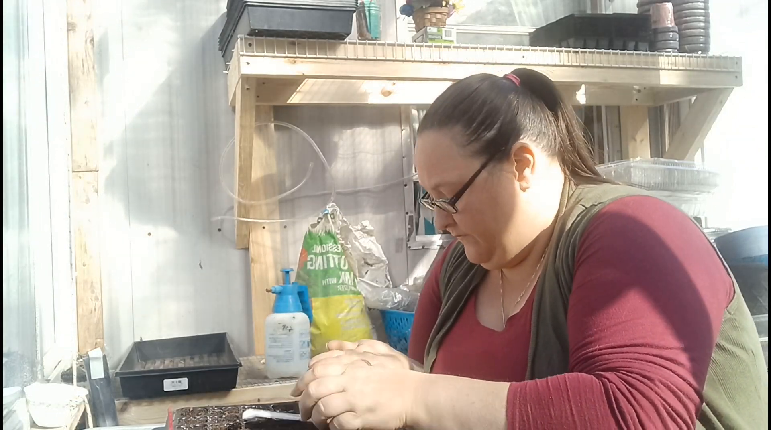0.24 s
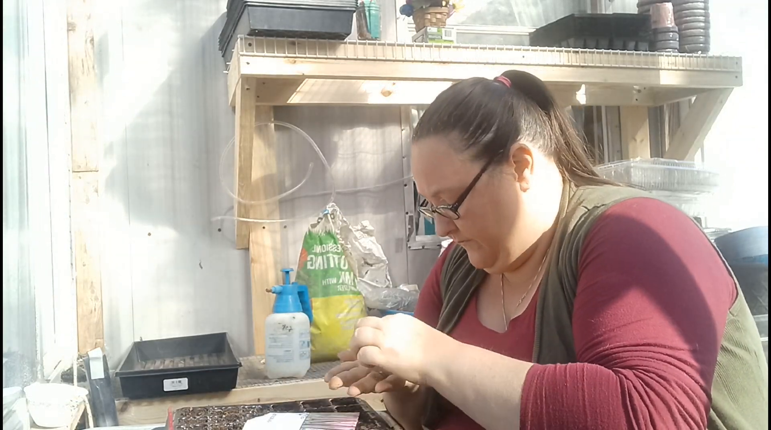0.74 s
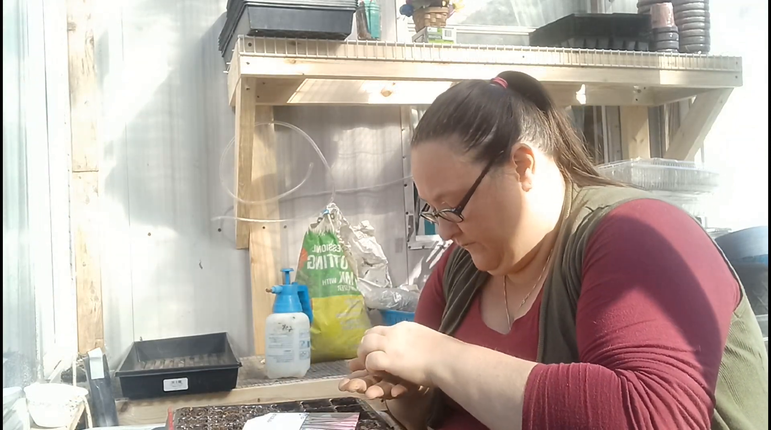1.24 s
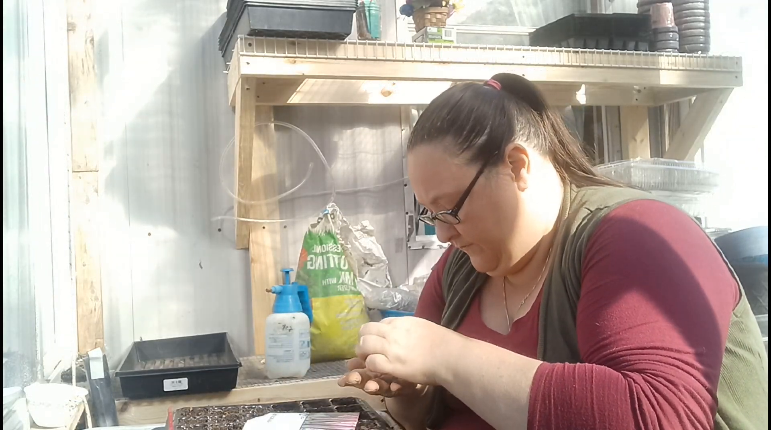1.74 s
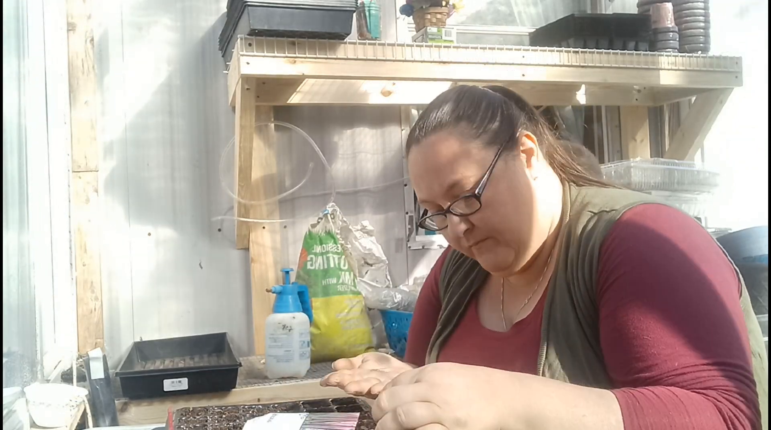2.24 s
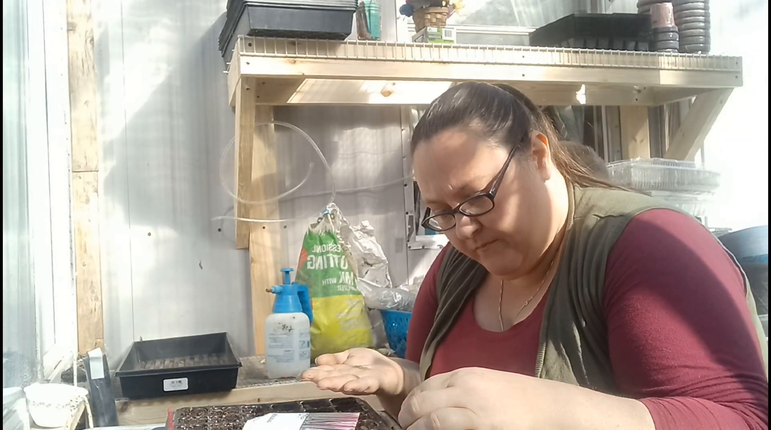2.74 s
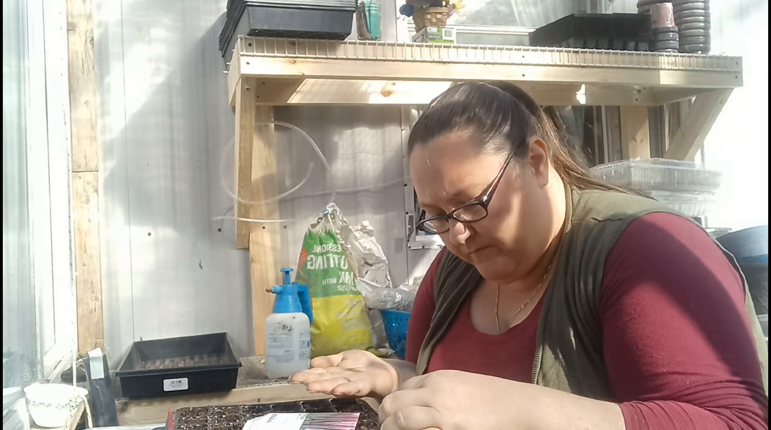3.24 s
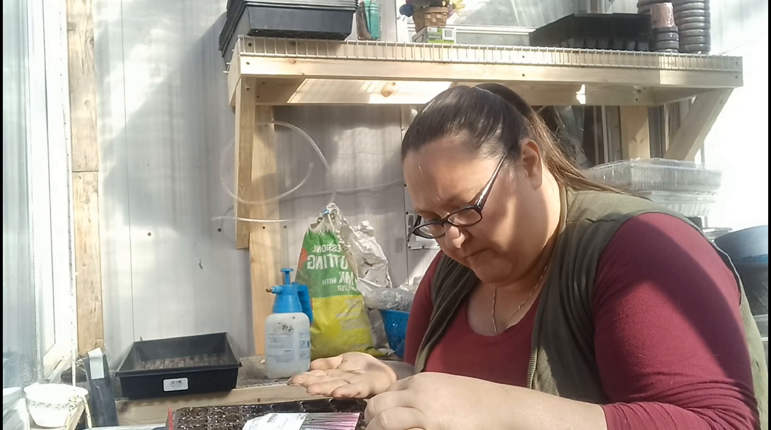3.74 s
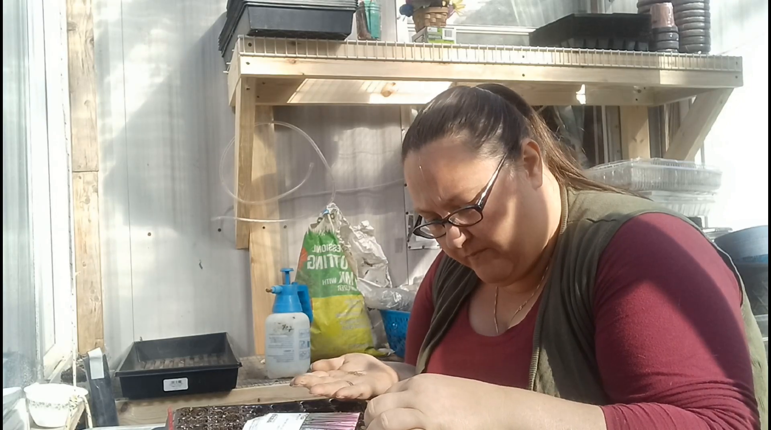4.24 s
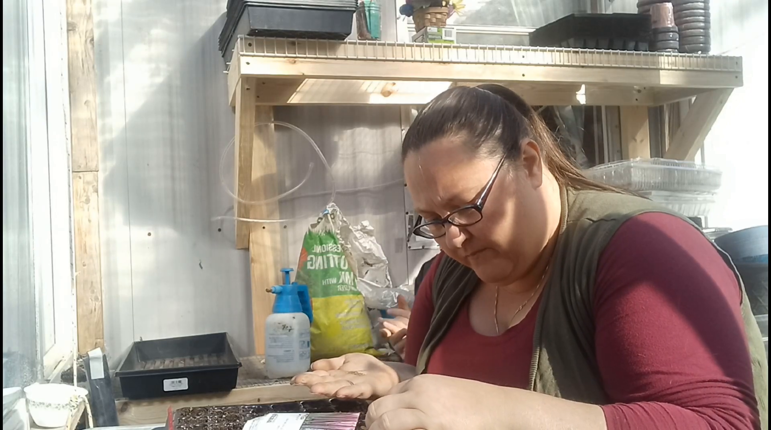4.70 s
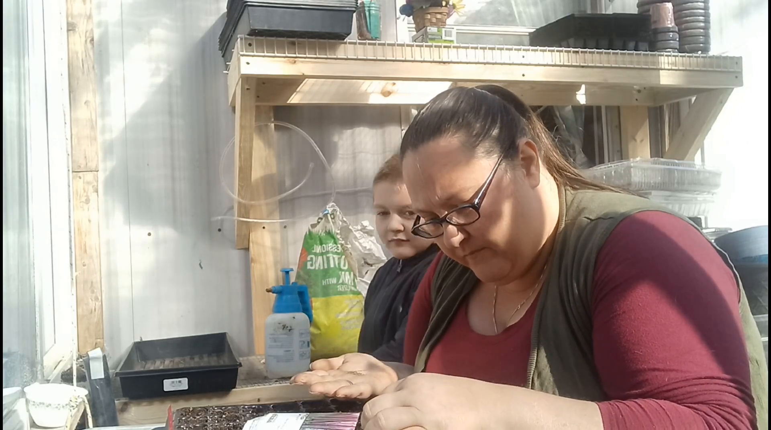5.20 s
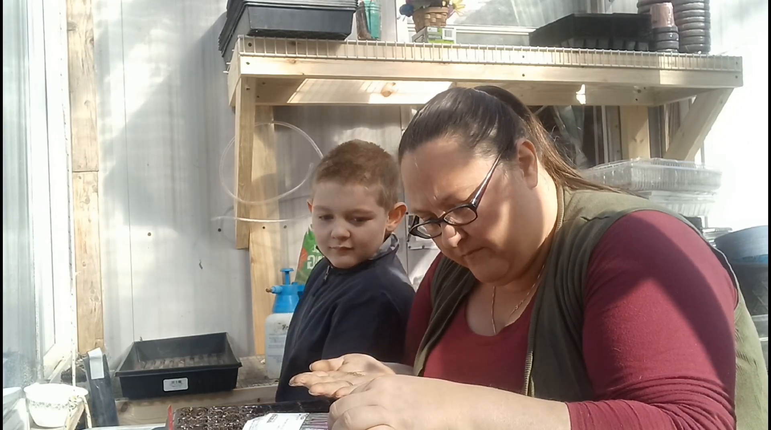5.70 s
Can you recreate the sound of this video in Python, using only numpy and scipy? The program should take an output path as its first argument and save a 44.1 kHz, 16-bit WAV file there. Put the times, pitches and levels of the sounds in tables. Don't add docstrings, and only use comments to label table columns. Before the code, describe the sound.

Close fingers rub a paper packet in dry, uneven swells with faint squeaks and creases, then pat and set it down softly. After a quiet lull with two tiny seed ticks, the paper crumples brightly, is flicked, a plastic tray is knocked, and the packet is slapped before softer rubbing. Small hard-walled greenhouse, short diffuse ring; stereo device microphone with hiss and low gust rumble.

```python
import sys
import numpy as np
from scipy import signal
from scipy.fft import rfft, irfft
from scipy.io import wavfile
from scipy.ndimage import uniform_filter1d

SR = 44100
rng = np.random.default_rng(int(sys.argv[2]) if len(sys.argv) > 2 else 0)


def voltage_ratio(level):
    return 10 ** (np.asarray(level, float) / 20)


def unload_wav(signal):
    wavfile.write(
        sys.argv[1],
        SR,
        np.round(np.clip(np.atleast_2d(signal).T, -1, 1) * 32767).astype(np.int16),
    )


N = 262742


def at_hz(points, hz):
    points = np.array(points)
    return np.interp(np.log(hz), np.log(points[:, 0]), points[:, 1])


def rms_one(x):
    return x / np.sqrt(np.mean(x ** 2) + 1e-20)


def drift(rate_hz):
    r = np.exp(-80 * np.pi * rate_hz / SR)
    white = rng.standard_normal(N // 40 + 2002)
    slow = signal.lfilter([1], [1, -2 * r, r * r], white)[2000:]
    return np.interp(np.arange(N) / 40, np.arange(len(slow)), rms_one(slow))


def bands(low_hz, high_hz, count):
    edges = np.geomspace(low_hz, high_hz, count + 1)
    return [(np.sqrt(a * b), signal.butter(2, [a, b], "band", fs=SR, output="sos"))
            for a, b in zip(edges, edges[1:])]


def swells(peak_s, peak_db, rise_s, fall_s, rest_db):
    roundness = 0.63
    t = np.arange(0, N + 64, 64)[:, None] / SR
    below = np.maximum((peak_s - t) / rise_s, (t - peak_s) / fall_s)
    power = voltage_ratio(2 * (peak_db - 20 * below ** roundness)).sum(1) + voltage_ratio(2 * rest_db)
    return np.interp(np.arange(N) / SR, t[:, 0], 10 * np.log10(power))


# pitch_hz, likeness [-1 to 1]
PORT_LIKENESS = [(60, 0.88), (180, 0.8), (550, 0.25), (1650, -0.22), (4970, 0.19), (15000, -0.11)]
# pitch_hz, level_db
LEFT_OVER_RIGHT = [(60, 4), (150, 7.5), (380, 0), (950, -0.5), (2380, 4), (5980, 0.5), (15000, 6)]


def stereo_band(white, hz, sos):
    mid, side = signal.sosfilt(sos, white)
    alike = at_hz(PORT_LIKENESS, hz)
    lean = voltage_ratio(at_hz(LEFT_OVER_RIGHT, hz) / 2)
    mid, side = np.sqrt(1 + alike) * mid, np.sqrt(1 - alike) * side
    return np.array([(mid + side) * lean, (mid - side) / lean])


def air(colour, low_hz, high_hz, count, patchy_db):
    white, out = rng.standard_normal((2, 2, N)), 0
    for k, (hz, sos) in enumerate(bands(low_hz, high_hz, count)):
        gain = voltage_ratio(at_hz(colour, hz) + patchy_db * drift(12.0))
        out = out + gain * stereo_band(white[k % 2], hz, sos)
    return out / np.std(out.mean(0))


def contact_burst(t, contact_s):
    swell = t * np.exp(-t / contact_s)
    burst = rng.standard_normal(len(t)) * swell
    for _ in range(12):
        spectrum = rfft(burst)
        flat = irfft(spectrum / (abs(spectrum) + 1e-12), len(t))
        burst = swell * flat / np.sqrt(abs(uniform_filter1d(flat ** 2, size=25)) + 1e-12)
    return burst + 1e-18


def struck(burst, colour):
    hz = np.maximum(np.fft.rfftfreq(len(burst), 1 / SR), 1)
    cepstrum = irfft(np.log(voltage_ratio(at_hz(colour, hz))))
    cepstrum[1:len(burst) // 2] *= 2
    cepstrum[len(burst) // 2 + 1:] = 0
    rung = irfft(rfft(burst) * np.exp(rfft(cepstrum)))
    return rung / np.linalg.norm(rung)


def contacts(events, colours):
    out, t = np.zeros(N), np.arange(8192) / SR
    for (start_s, peak_db, contact_s), colour in zip(events, colours):
        at = round((start_s - 0.8 * contact_s) * SR)
        out[at:at + len(t)] += voltage_ratio(peak_db + 24.0) * struck(contact_burst(t, contact_s), colour)
    return out


def grains(per_s, spread_db):
    sizes = voltage_ratio(spread_db * np.minimum(rng.exponential(1, N), 5)) * rng.choice([-1, 1], N)
    return rms_one(sizes * (rng.random(N) < per_s / SR))


# peak_s, sheen_db, rise_s, fall_s, weight_db (body over sheen)
TIPPING = [(0.0, -63, .05, 0.013, -9), (0.08, -71.5, .3, 0.15, -54), (0.212, -69, 0.05, 0.026, -24),
           (0.284, -82, 0.11, 0.32, -37), (0.37, -72.5, 0.063, 0.24, -9), (0.54, -74, 0.35, 0.16, -11),
           (0.658, -66.5, 0.067, 0.56, -20.5), (0.748, -70.5, 0.16, .2, -2), (0.816, -60, 0.12, 0.02, 7.5),
           (0.888, -74, 0.16, 0.019, 10.5), (1.17, -82, 0.12, 0.15, 2), (1.216, -82, 0.16, 0.28, 9),
           (1.3, -90, 0.15, 0.15, 3), (1.4, -85.5, 0.14, 0.13, -2), (1.482, -88.5, 0.21, 0.02, 14),
           (1.559, -88.5, 0.065, 0.025, 16), (1.68, -70.5, 0.021, 0.024, -26), (1.79, -77, 0.1, 0.053, 7.5),
           (1.848, -75, 0.061, 0.1, 3.5), (1.95, -84.5, 0.14, .2, -8), (2.054, -69, 0.17, 0.045, -8),
           (2.095, -66.5, 0.019, 0.096, -9)]
CRUMPLING = [(2.872, -102, 0.1, 0.058, -3), (2.959, -91, 0.083, 0.043, -24.5), (3.16, -84, 0.03, 0.21, 3),
             (3.252, -73, 0.15, 0.066, -1.5), (3.325, -62.5, 0.15, 0.13, -6.5), (3.42, -75.5, 0.3, 0.27, 6),
             (3.498, -63, 0.1, 0.12, -1.5), (3.664, -64, 0.095, 0.14, 7), (3.715, -45.5, 0.069, 0.078, -59),
             (3.765, -49, 0.036, 0.037, -30), (3.802, -51.5, 0.014, 0.084, -16),
             (3.85, -49.5, 0.078, 0.074, -30), (3.941, -49, 0.094, 0.026, -18),
             (3.966, -57.5, 0.065, 0.036, 9), (4.095, -67.5, 0.22, 0.16, 7), (4.21, -64.5, 0.15, 0.045, -2),
             (4.32, -76.5, 0.19, .1, -2), (4.42, -71.5, 0.17, 0.32, -1.5)]
SMOOTHING = [(4.632, -69, 0.14, 0.57, -18), (4.705, -59.5, 0.012, 0.24, -0.5),
             (4.76, -70.5, 0.077, 0.13, 12.5), (4.97, -84, .2, 0.27, -16.5), (5.06, -68, 0.16, 0.25, -10),
             (5.142, -64, 0.088, 0.13, 3), (5.226, -63.5, 0.33, 0.1, -0.5), (5.4, -69.5, 0.16, 0.97, -22),
             (5.602, -64, 0.43, 0.52, 0.5), (5.779, -64.5, 0.47, 0.085, -7), (5.818, -69, 0.036, 0.055, 8),
             (5.89, -64, 0.31, 0.096, -18)]
# peak_s, peak_db, rise_s, fall_s
LEANS = [(0.369, -81, 0.038, 0.23), (0.47, -82.5, 0.13, 0.18), (0.66, -89, 0.093, 0.13),
         (1.45, -102, 0.09, 0.17), (1.798, -91, 0.17, 0.15), (3.35, -85, 0.084, 0.12),
         (3.5, -79.5, 0.11, 0.093), (3.67, -74, 0.088, 0.13), (3.98, -73.5, 0.1, 0.13),
         (4.73, -75, 0.082, 0.25), (5.06, -80, 0.18, 0.09), (5.2, -79.5, 0.07, 0.13),
         (5.54, -78.5, 0.28, 0.69), (5.92, -84, 0.4, .2)]
# low_hz, high_hz
RUB_BANDS = [(11000, 15000), (4000, 8000), (1000, 2000), (250, 600)]
# pitch_hz, level_db
RUB_COLOUR = [(90, -5), (200, 1), (360, -5.5), (580, -1), (800, -5), (1250, -1.5), (2300, 3), (3600, 13),
              (5500, 19.5), (7500, 16), (9500, 1.5), (12500, 1), (15500, -2.3)]


def rubbing():
    still_db = -104
    peak_s, sheen_db, rise_s, fall_s, weight_db = np.transpose(TIPPING + CRUMPLING + SMOOTHING)
    rasp_db = -20.5 + 0.17 * weight_db
    hum_db = -19.5 + 0.59 * weight_db
    levels = np.array([swells(peak_s, sheen_db + over_db, rise_s, fall_s, still_db)
                       for over_db in (0 * weight_db, rasp_db, weight_db, hum_db)])
    lean_db = swells(*np.transpose(LEANS), still_db)
    levels[3] = 10 * np.log10(voltage_ratio(2 * levels[3]) + voltage_ratio(2 * lean_db))

    width_db = 10 * np.log10([[2 * (high - low) / SR] for low, high in RUB_BANDS])
    density_db = (levels - width_db)[::-1]
    centres = np.log([np.sqrt(low * high) for low, high in RUB_BANDS])[::-1]
    slips, together, out = grains(7000, spread_db=3.0), drift(3.04), 0
    for k, (hz, sos) in enumerate(bands(90, 18000, count=23)):
        shares = [np.interp(np.log(hz), centres, row) for row in np.eye(4)]
        patch_db = 1.2 * together + 1.3 * drift(8)
        gain = voltage_ratio(shares @ density_db + at_hz(RUB_COLOUR, hz) + patch_db)
        out = out + (-1) ** k * signal.sosfilt(sos, gain * slips)
    return out


# peak_s, peak_db, spread_s (for 20 dB)
GUSTS = [(0.0, -59, 0.25), (0.23, -68.5, 1.1), (0.46, -64, 0.05), (0.81, -71, 0.6), (1.13, -69, 0.5),
         (1.45, -68, 0), (1.78, -78, 0.5), (2.04, -66, 0), (2.18, -61.5, 0.46), (2.45, -66, -3.5),
         (2.6, -72.5, -0.2), (2.845, -59.5, 0.02), (3.07, -83, 3), (3.22, -66.5, -0.6), (3.37, -62, 0.2),
         (3.6, -71, -0.7), (3.82, -58, 0.17), (3.98, -63, -0.2), (4.13, -54.5, -0.7), (4.4, -69, -3.8),
         (4.66, -62.5, 1.8), (4.83, -49, -0.24), (5.1, -70, -1.6), (5.28, -66, -1.5), (5.531, -51.5, 0.28),
         (5.68, -53.5, -0.6), (5.93, -64, 0.4)]
# pitch_hz, level_db (per Hz)
RUMBLE_COLOUR = [(12, -54), (25, -33), (54, -11.5), (70, -3), (87, -6.5), (118, -31), (140, -18),
                 (180, -47), (310, -120)]


def rumble():
    lows = air(RUMBLE_COLOUR, 21.0, 149.0, count=7, patchy_db=-3.0)
    swing = uniform_filter1d(np.mean(lows ** 2, 0), size=1800)
    evened = rms_one(lows / (swing + 0.05) ** 0.28)
    peak_s, peak_db, spread_s = np.transpose(GUSTS)
    spread_s = np.maximum(spread_s, 0.07)
    return voltage_ratio(swells(peak_s, peak_db, spread_s, spread_s, rest_db=-82)) * evened


# pitch_hz, level_db (per Hz)
HISS_COLOUR = [(65, -39), (110, -10), (200, -22), (310, -21), (683, -21), (1040, -22), (1740, -21),
               (3400, -25), (4710, -27), (7000, -22), (9500, -19), (12000, -10), (15700, -8.5)]


def hiss():
    return voltage_ratio(-73.5) * air(HISS_COLOUR, 100, 17500, count=15, patchy_db=2.2)


# peak_s, peak_db, rise_s, fall_s, centre_hz
SQUEAKS = [(0.012, -70, 0.03, 0.06, 3500), (0.19, -70, 0.05, 0.11, 3850), (0.385, -72, .04, 0.07, 3520),
           (0.55, -73, 0.06, .12, 3750), (0.56, -75, 0.05, .1, 2550), (1.1, -72, .08, 0.12, 3280),
           (1.145, -67, 0.09, 0.07, 3900), (1.385, -70, 0.07, 0.1, 3520), (1.67, -77, 0.03, 0.03, 7000),
           (2.875, -79, 0.07, 0.05, 2350)]


def squeaks(width_hz):
    climb_hz_per_s = 500
    out, t = np.zeros(N), np.arange(N) / SR
    lowpass = signal.butter(2, width_hz / 2, fs=SR, output="sos")
    pair = signal.sosfilt(lowpass, rng.standard_normal((2, N)))
    for peak_s, peak_db, rise_s, fall_s, hz in SQUEAKS:
        centre_hz = hz + climb_hz_per_s * np.clip(t - peak_s, -rise_s, 0)
        turn = 2 * np.pi * np.cumsum(centre_hz) / SR
        level_db = swells(peak_s, peak_db, rise_s, fall_s, rest_db=-140)
        carried = rms_one(pair[0] * np.cos(turn) + pair[1] * np.sin(turn))
        out += voltage_ratio(level_db + 2.1 * drift(25)) * carried
    return out


# start_s, peak_db, contact_s
CREASES = [(0.092, -58, 0.0055), (0.383, -61, 0.0051), (0.649, -51, 0.0045), (0.789, -33, 0.0047),
           (0.813, -56, 0.0063), (0.874, -43, 0.0051), (1.219, -49, 0.0069), (1.459, -47.5, 0.0065),
           (3.33, -51, 0.0049), (3.499, -40, 0.005), (3.714, -31.5, 0.0045), (3.791, -35.5, 0.005),
           (3.849, -59, 0.0034), (3.934, -28, 0.0052), (4.693, -40.5, 0.0054), (4.924, -42, 0.0017)]
# pitch_hz, level_db (per Hz)
CREASE_COLOUR = [(180, -66), (300, -22), (1000, -4.5), (1300, 2.5), (4650, -17), (8010, 4.5), (8840, -1.5),
                 (12900, 3.5), (15500, -5)]


def creases():
    return contacts(CREASES, [CREASE_COLOUR] * len(CREASES))


# start_s, peak_db, contact_s
KNOCKS = [
    (1.716, -42.5, 0.0082),
    (2.113, -37.5, 0.0057),
    (2.134, -41.5, 0.0082),
    (4.111, -18.5, 0.0026),
    (4.361, -46.5, 0.0018),
    (4.451, -12.5, 0.0034),
    (4.562, -41, 0.0015),
    (4.802, -19, 0.0026),
]
# start_s, peak_db, contact_s
THUDS = [
    (1.745, -55, 0.0146),
    (2.148, -44.5, 0.026),
]
# pitch_hz, level_db (per Hz)
PAT = [(65, -17), (110, 7), (237, -1), (414, -21), (1190, -1), (3490, -7), (5980, -11), (12900, -6.5),
       (15500, -6)]
SET_DOWN = [(65, -34), (110, -14), (553, -4), (820, -3), (872, -12), (1100, 2.5), (1320, -5), (1660, -0.5),
            (15500, -29)]
FLICK = [(65, -54), (110, -18.5), (405, -18.5), (786, -10), (890, -20), (1100, -1.5), (1660, -8),
         (2200, -5.5), (2400, -4), (2840, 0.5), (4500, -3), (7210, -6.5), (9050, -15.5), (12900, -6),
         (15500, -8)]
TICK = [(350, -64), (600, -44), (886, -17), (1250, 3), (1910, -21), (2560, -8), (3080, -34), (4360, -24),
        (8000, -36), (10400, -73), (17600, -120)]
TRAY = [(65, -61), (110, -35), (279, -8.5), (400, -10), (510, -0.5), (626, -1), (694, 1.5), (754, -2),
        (909, -5.5), (1270, 0), (1460, -11.5), (2610, -12), (4120, -20), (5860, -6.5), (7060, -20.5),
        (12100, -21), (15500, -24)]
REBOUND = [(120, -57), (200, -42), (333, -19), (1260, 3), (1430, -2), (2290, -4), (2960, -9), (15500, -28)]
SLAP = [(65, -43.5), (110, -25.5), (213, -14.5), (653, -10.5), (837, -17), (1010, -3), (2700, -1),
        (3790, -7.5), (8160, -3), (9830, -25.5), (11600, -18), (15500, -11)]
BENCH = [(47, -32), (80, -6), (136, -14.5), (186, -7.5), (233, -15), (286, -6), (474, -17), (1500, -25),
         (1950, -72), (3300, -120)]


def knocks_and_thuds():
    bodies = [PAT, SET_DOWN, SET_DOWN, FLICK, TICK, TRAY, REBOUND, SLAP]
    return contacts(KNOCKS + THUDS, bodies + [BENCH, BENCH])


# pitch_hz, level_db, t60_s
BENCH_RING = (300, -55, 0.35)


def bench_ring():
    hz, level_db, t60_s = BENCH_RING
    t = np.clip(np.arange(N) / SR - THUDS[1][0], 0, None)
    level = voltage_ratio(level_db - 60 * t / t60_s + 3.3 * drift(17))
    return level * (1 - np.exp(-t / 0.027)) * np.sin(2 * np.pi * hz * t)


# start_s, peak_db, contact_s
SEEDS = [
    (2.4026, -74, 0.0003),
    (2.464, -68, 0.0003),
]
# pitch_hz, level_db (per Hz)
SEED_COLOUR = [(1000, -50), (5000, -20), (7000, 0), (10500, -2), (12500, -20), (15500, -30)]


def seeds():
    return contacts(SEEDS, [SEED_COLOUR] * len(SEEDS))


# start_s, peak_db, contact_s
FIBRES = [(3.7155, -44.5, 0.00021), (3.723, -52, 0.00015), (3.746, -44, 0.00015), (3.7694, -39, 0.00017),
          (3.7913, -33.5, 0.00015), (3.8, -35, 0.00022), (3.878, -50, 0.00018), (3.9378, -45, 0.00026),
          (3.952, -35, 0.00023), (4.925, -52, 0.00019)]
# pitch_hz, level_db (per Hz)
FIBRE_COLOUR = [(300, -46), (2000, -30), (6000, -8), (12900, -1), (15500, 1)]


def fibres():
    return contacts(FIBRES, [FIBRE_COLOUR] * len(FIBRES))


# start_s, peak_db, contact_s
CRACKS = [
    (4.1147, -26.5, 0.000425),
    (4.8056, -24, 0.00033),
]
# start_s, peak_db, contact_s
SETTLE = [
    (4.205, -46.5, 0.006),
]
# pitch_hz, level_db (per Hz)
SNAP = [(110, -27), (500, -22), (1100, -8), (1900, -10.5), (2350, 4.5), (2750, 2.5), (3300, -6),
        (7000, -22), (15500, -23)]


def cracks_and_settle():
    return contacts(CRACKS + SETTLE, [SNAP, SLAP, REBOUND])


def direct(x, level_db, lag):
    return voltage_ratio(level_db) * np.array([voltage_ratio(3.0) * np.roll(x, lag), voltage_ratio(-6.0) * x])


# pitch_hz, t60_s
SHED_RING = [(200, 0.29), (530, 0.23), (1390, 0.2), (3680, 0.21), (9700, 0.19)]


def shed(x, fill_cycles, count):
    spot_s, tail_cut_s = 0.03, 0.2
    t = np.arange(SR // 2) / SR
    white, echoes = rng.standard_normal((2, 2, count, len(t))), 0
    for k, (hz, sos) in enumerate(bands(60, 19000, count=16)):
        dying = voltage_ratio(-60 * t / at_hz(SHED_RING, hz))
        dying = dying * (1 - np.exp(-t / (0.0017 + fill_cycles / hz)))
        dying = dying * np.exp(-(t / (tail_cut_s + 15 / hz)) ** 4)
        echoes = echoes + stereo_band(white[k % 2], hz, sos) * dying / np.linalg.norm(dying)
    echoes = echoes / np.sqrt(2)
    spot = np.arange(N) / SR / spot_s
    away = [abs((spot - k + count / 2) % count - count / 2) for k in range(count)]
    shares = np.sqrt(np.clip(1 - np.array(away), 0, 1))
    return signal.fftconvolve((x * shares)[None], echoes, axes=2)[:, :, :N].sum(1)


# middle_s, depth_db, half_span_s
LULLS = [(1.03, -5, 0.079), (1.62, -4, 0.062), (2.29, -1.5, 0.059), (3.06, -3, .09), (3.89, -3.5, 0.034),
         (5.33, -2.5, 0.061)]


def gate():
    t = np.arange(N) / SR
    return voltage_ratio(sum(depth_db * np.exp(-((t - middle_s) / half_span_s) ** 4)
                   for middle_s, depth_db, half_span_s in LULLS))


def scene():
    paper = voltage_ratio(7.5) * rubbing() + voltage_ratio(4.0) * squeaks(width_hz=300) + voltage_ratio(-6.5) * creases()
    bench = knocks_and_thuds()
    snaps = seeds() + fibres() + cracks_and_settle()
    straight = direct(paper, -4.5, lag=2) + direct(bench, -13.0, lag=3) + direct(snaps, -0.38, lag=3)
    ringing = shed(bench + snaps + paper, fill_cycles=0.31, count=10)
    return gate() * (straight + bench_ring() + hiss() + ringing) + rumble()


def roll_off(x):
    return signal.sosfilt(signal.butter(12, 16650, fs=SR, output="sos"), x)


def record(dry):
    notched = signal.lfilter(*signal.iirnotch(9700, 9.0, fs=SR), dry)
    housed = dry + 0.21 * (notched - dry)
    top_cut = signal.ellip(9, 0.5, 50, 15560, fs=SR, output="sos")
    return roll_off(signal.sosfilt(top_cut, housed))


dry = scene()
out = record(dry)
unload_wav(out)
```